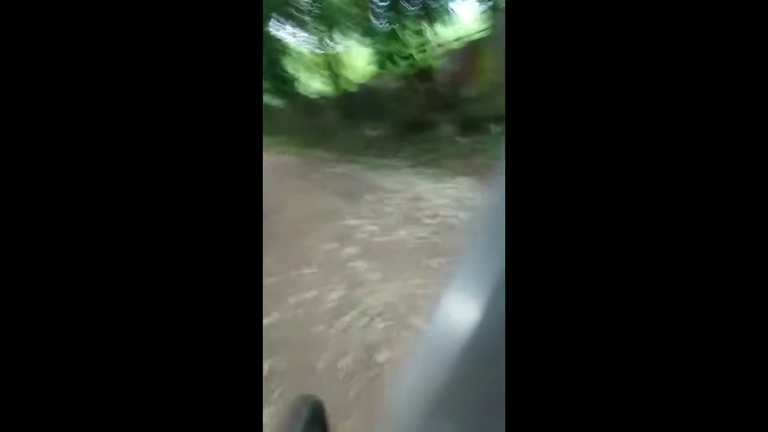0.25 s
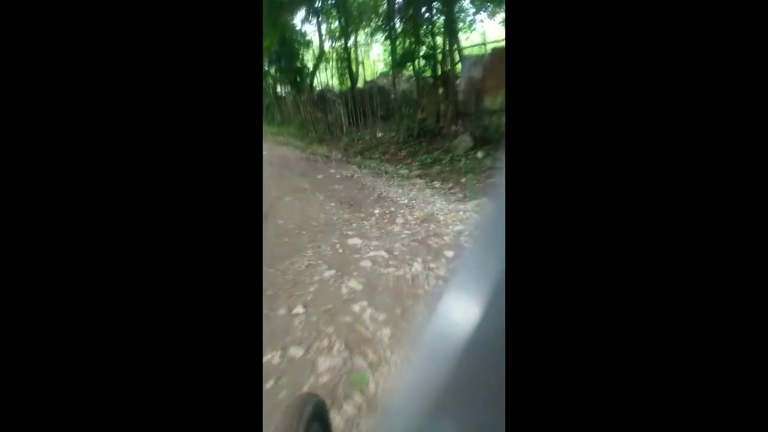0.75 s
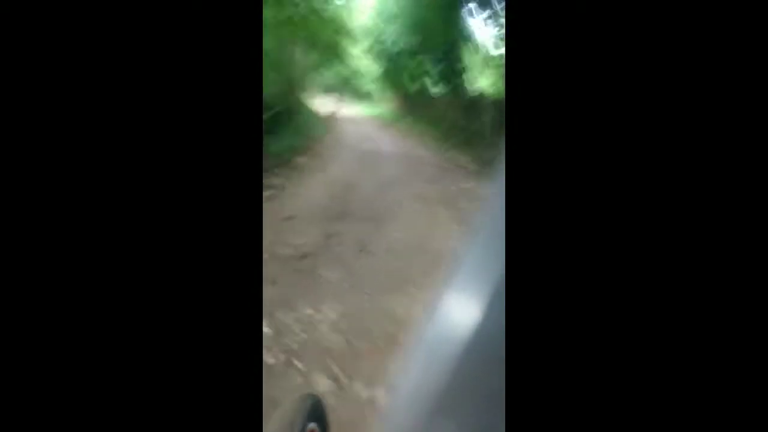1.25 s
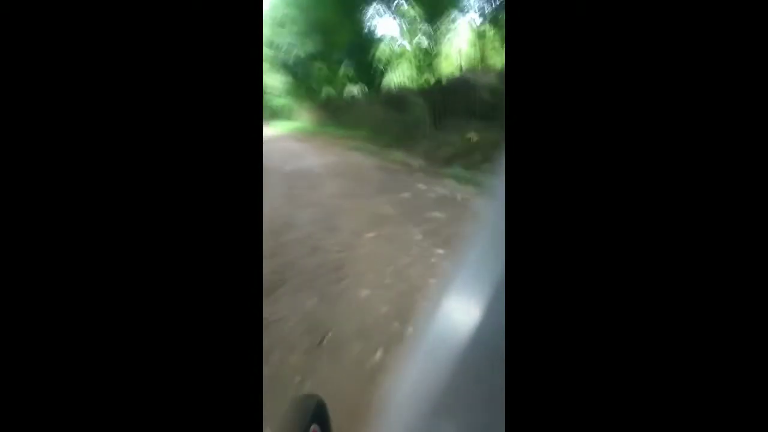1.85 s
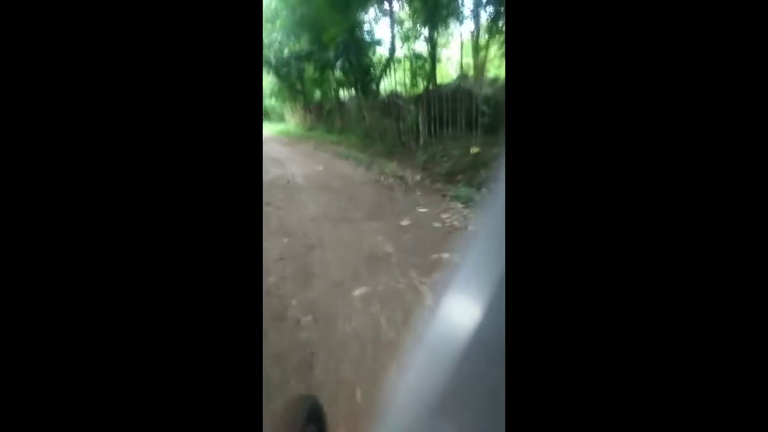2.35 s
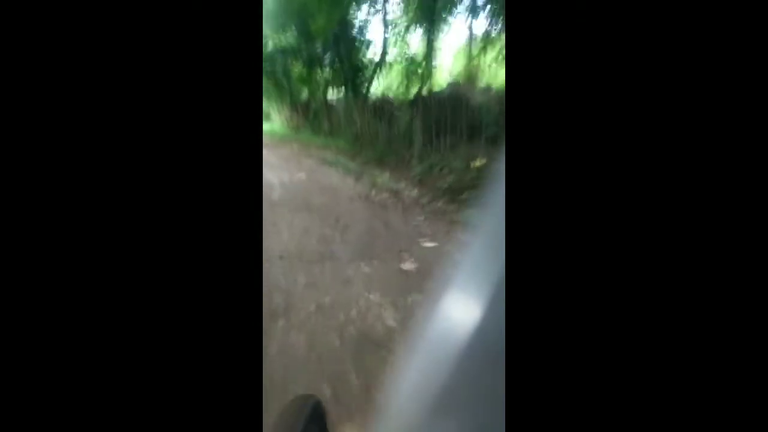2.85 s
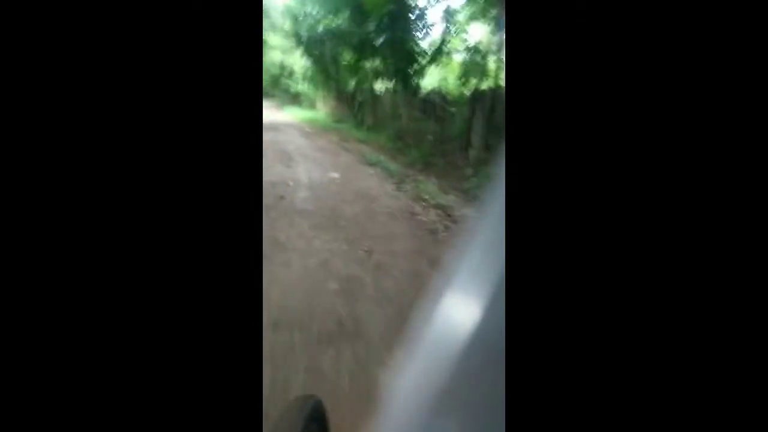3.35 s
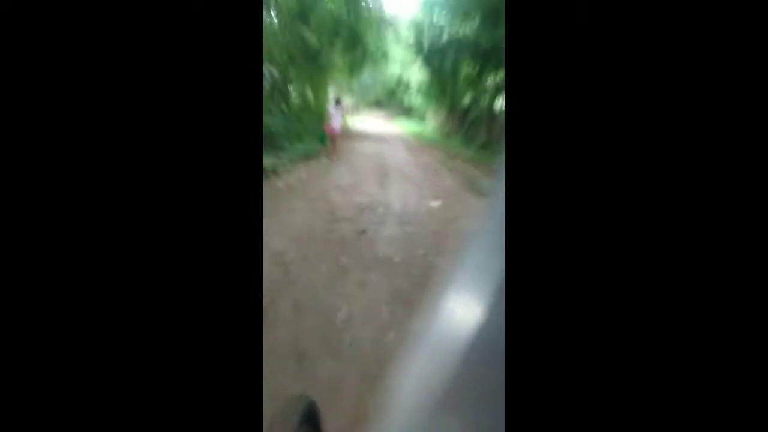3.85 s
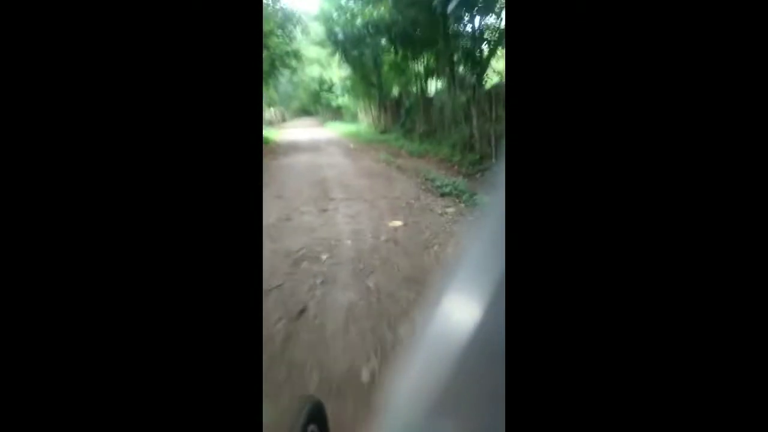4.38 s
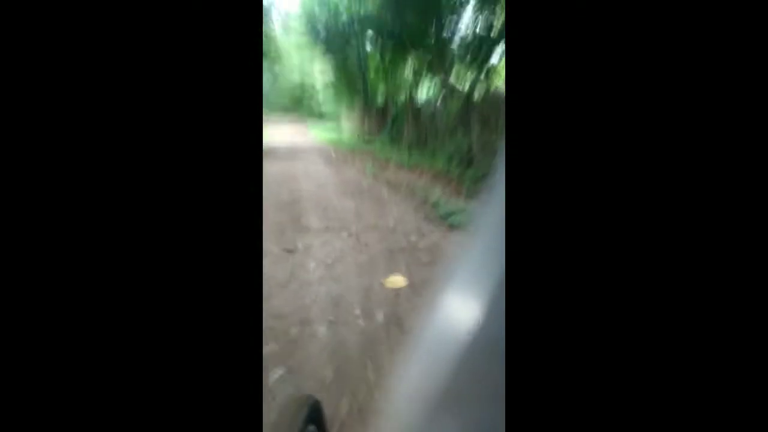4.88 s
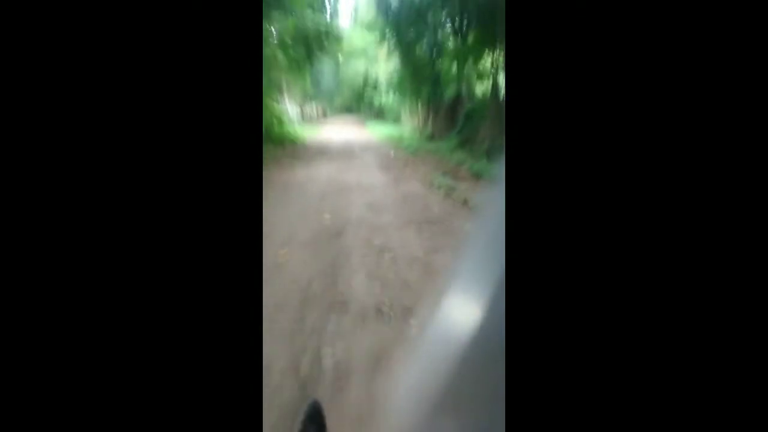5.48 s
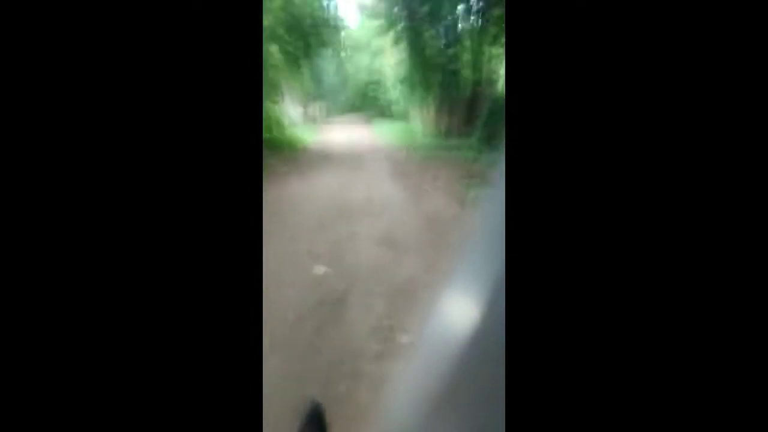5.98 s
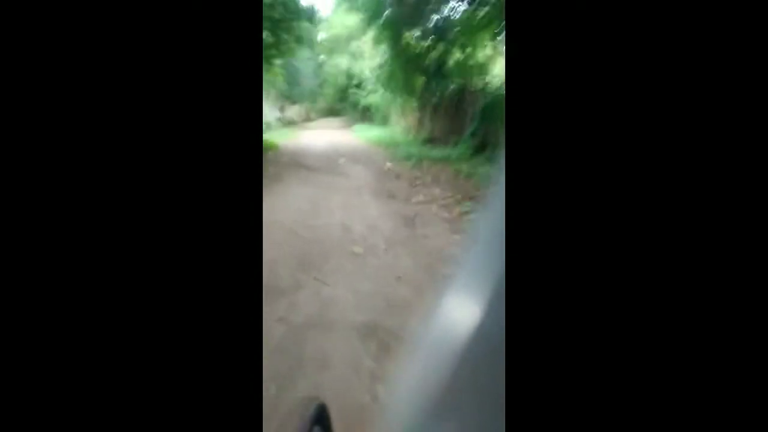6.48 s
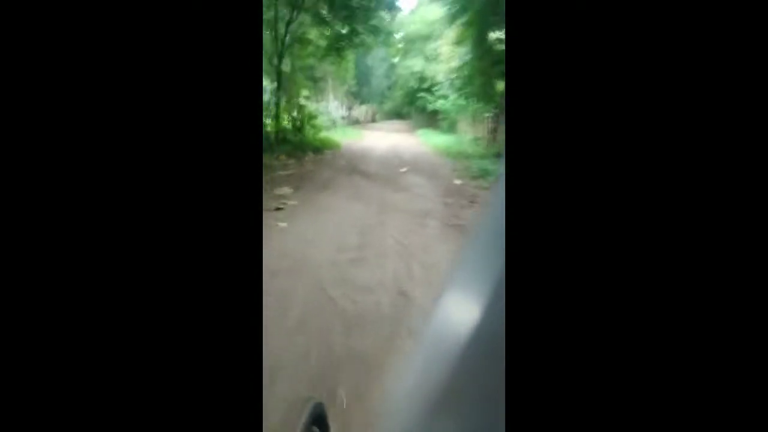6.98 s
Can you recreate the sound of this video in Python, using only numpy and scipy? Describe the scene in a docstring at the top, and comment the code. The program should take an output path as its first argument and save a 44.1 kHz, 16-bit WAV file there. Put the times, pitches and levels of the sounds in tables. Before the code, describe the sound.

Close on a coasting bike, high brake chirps give way to fast hub clicks, deepening rumble and thumps, then a violent clatter around six seconds.

```python
"""A bicycle coasts down a dirt trail, heard from close by.
A brake squeals at once, a wavering sine for each grab of the pad, over early knocks and scuffs of stones.
The freewheel ticks throughout as bursts of noise in a hub colour, unevenly quickening from 13 to 24 teeth a second.
Noise makes the rumble and tyre drumming that grow beneath, and the thumps over ruts from 1.5 s on.
Grit crackles as showers of tiny impacts; knocks of noise and ringing modes crowd in hardest around 6 s."""
import sys
import numpy as np
from scipy import signal
from scipy.fft import rfft, irfft
from scipy.io import wavfile
from scipy.ndimage import uniform_filter1d

SR = 44100
rng = np.random.default_rng(int(sys.argv[2]) if len(sys.argv) > 2 else 0)


def int16_out(signal):
    """Quantize to a 16-bit WAV file."""
    q = np.round(np.clip(np.atleast_2d(signal).T, -1, 1) * 32767)
    wavfile.write(sys.argv[1], SR, q.astype(np.int16))


N = 318831
TIME = np.arange(N) / SR

# Colour of struck metal, for pebbles and knocks alike. Each row: frequency in Hz, relative level in dB per Hz.
CLINK_COLOUR = [(800, -41.5), (2000, 6.5), (3200, 6.5), (4800, 1.5), (6500, 4), (8200, 11), (10500, -2.5),
                (13000, 2), (16000, -22)]


def amp(db):
    """Decibels to gain."""
    return 10 ** (np.asarray(db) / 20)


def unit(x):
    """Scales to rms 1."""
    return x / np.sqrt(np.mean(x ** 2) + 1e-20)


def add(mix, s, sound):
    """Mixes a sound in at time s."""
    part = mix[max(round(s * SR), 0):][:len(sound)]
    part += sound[:len(part)]


def curve(rows, axis):
    """One column of a table, joined by straight lines in time."""
    columns = np.transpose(rows)
    return np.interp(TIME, columns[0], columns[axis])


def colour(x, spectrum, size=8192):
    """Causal minimum-phase filter of unit energy with the given spectrum."""
    hz, db = np.transpose(spectrum)
    bin_hz = abs(np.fft.fftfreq(size, 1 / SR))
    bin_db = np.interp(np.log(bin_hz + 1), np.log(hz), db)
    log_gain = np.log(amp(bin_db))
    response = np.exp(np.conj(signal.hilbert(log_gain)))
    taps = np.fft.ifft(response).real[:size // 2]
    return signal.oaconvolve(x, taps / np.linalg.norm(taps))[:N]


def wander(hz):
    """Slow random drift of rms 1, up to about hz."""
    f = np.fft.rfftfreq(N, 1 / SR)
    spectrum = rfft(rng.standard_normal(N)) * np.exp(-(f / hz) ** 2)
    return unit(irfft(spectrum, N))


def ring(x, t60):
    """Follows a sound with a dense tail of unit energy that falls 60 dB in t60 seconds."""
    t = TIME[:SR]
    tail = rng.standard_normal(SR) * amp(-60 * t / t60)
    return signal.oaconvolve(x, tail / np.linalg.norm(tail))[:N]


def steady(x, span_s):
    """Evens out the slow swells of a signal, leaving its quick lumps."""
    power = abs(uniform_filter1d(x ** 2, int(span_s * SR)))
    return x / np.sqrt(power + 1e-9)


def clicks(per_s, spread_db):
    """Random impacts, most small and a few large."""
    sizes = amp(spread_db * np.minimum(rng.exponential(1, N), 3.5))
    signs = rng.choice([-1, 1], N)
    return sizes * signs * (rng.random(N) < per_s / SR)


def stones(per_s, spread_db, cycles, count=32):
    """Small stones crack together, each ringing briefly at its own pitch."""
    hits = clicks(per_s, spread_db)
    kind = rng.integers(0, count, N)
    t = TIME[:1000]
    out = np.zeros(N)
    for k, hz in enumerate(np.geomspace(620, 8000, count)):
        # a grain falls to 1/e in the given number of cycles
        grain = np.sin(2 * np.pi * hz * t) * np.exp(-hz * t / cycles) * hz
        out += signal.oaconvolve(hits * (kind == k), grain)[:N]
    return unit(out)


def rumble(low_db=3.5, drum_db=-3, rut_low_db=-1, rut_drum_db=-5, lump_db=7.5, buffet_db=4.5, buffet_hz=14):
    """Wind and ground shake the frame; the tyres drum in lumps on the packed dirt and thump over ruts."""
    # The ride grows rougher with speed.
    # Each row: time in seconds, low rumble in dB and tyre drumming in dB, both before trim.
    ride = [(0.0, -36.5, -41), (0.18, -53, -54.5), (0.85, -53, -61), (1.3, -43, -59), (2.6, -39.5, -44),
            (3.25, -35, -40), (3.65, -30, -36.5), (4.55, -35, -32), (5.3, -28.5, -24.5), (5.75, -32.5, -30),
            (5.95, -27, -29.5), (6.5, -34.5, -28.5), (7.0, -30.5, -24), (7.23, -30, -23.5)]
    # Each row: start in seconds, drumming in dB and low rumble in dB, both before trim.
    ruts = [(1.501, -36, -33), (1.714, -37, -33), (1.853, -32.5, -33), (2.281, -32, -28.5),
            (2.484, -35, -29.5), (2.769, -30, -45), (2.876, -25.5, -25), (3.109, -29, -48),
            (3.186, -27, -35), (3.476, -19.5, -41), (3.706, -15, -27), (3.877, -20, -22),
            (4.123, -23.5, -38), (4.289, -41, -22), (4.657, -17, -45), (4.824, -30, -22.5),
            (4.937, -21.5, -33), (5.253, -18, -35), (5.499, -14.5, -25.5), (5.584, -14.5, -37),
            (5.957, -14, -39), (6.338, -16, -26), (6.695, -14, -26), (6.752, -15.5, -32),
            (6.991, -19.5, -36)]
    # Colours of the shaking frame, drumming tyres and a thump over a rut.
    # Each row: frequency in Hz, relative level in dB per Hz.
    frame_colour = [(8, -10), (25, -0.5), (90, -4), (125, -14.5), (180, -23.5), (400, -43), (1000, -88)]
    drum_colour = [(50, -20), (90, -5.5), (125, 4), (175, -1), (240, -10), (330, -21), (480, -29),
                   (900, -48.5), (3000, -82.5)]
    thump_colour = [(50, -11.5), (90, -3), (125, 4), (175, -2), (240, -12), (330, -21), (480, -27),
                    (900, -49), (3000, -77)]

    low = steady(colour(rng.standard_normal(N), frame_colour), span_s=0.089)
    lumpy = rng.standard_normal(N) * amp(lump_db * wander(65))
    drum = steady(colour(lumpy, drum_colour), span_s=0.047)
    casing = steady(colour(rng.standard_normal(N), thump_colour), span_s=0.0312)
    # one unevenness shakes both together
    buffets = steady(amp(buffet_db * wander(buffet_hz)), span_s=0.2)

    rise_s = 0.0098  # a thump swells for this long, then dies away
    u = TIME[:SR // 4] / rise_s
    thump = u * np.exp(1 - u)
    shakes, thumps = np.zeros((2, N))
    for s, tyre_db, shake_db in ruts:
        add(thumps, s, amp(tyre_db + rut_drum_db) * thump)
        add(shakes, s, amp(shake_db + rut_low_db) * thump)

    low_level = np.hypot(buffets * amp(curve(ride, axis=1) + low_db), shakes)
    drum_level = buffets * amp(curve(ride, axis=2) + drum_db)
    return low * low_level + drum * drum_level + casing * thumps


def gravel(wash_db=-2, crunch_db=-3, ping_db=-10, scuff_db=1):
    """Fine dirt hisses, stones crunch under the tread, and sand and pebbles fly up against the metal."""
    # Loose grit under the tyres. Each row: time in seconds, level in dB before the layer trims.
    grit_levels = [(0.0, -40), (0.14, -51.5), (0.4, -51.5), (0.7, -54), (3.7, -53), (4.6, -51.5),
                   (5.65, -48.5), (6.8, -49), (7.23, -55.5)]
    # The tyres scuff through loose stones. Each row: centre in seconds, length in seconds,
    # level in dB before trim, sandy spray relative to the scuff in dB.
    scuffs = [(0.211, 0.029, -48.5, -11), (0.31, 0.06, -47.5, -9), (0.415, 0.13, -47.5, -8),
              (1.296, 0.13, -53, -19), (1.852, 0.29, -56, -18), (2.332, 0.12, -57.5, 2.5),
              (2.742, 0.11, -51, -1), (3.895, 0.095, -44.5, -21), (4.057, 0.023, -46.5, -6),
              (4.14, 0.077, -50, -15), (5.325, 0.049, -47, -11), (5.86, 0.078, -39, -34),
              (5.957, 0.074, -47.5, -25), (6.226, 0.038, -38.5, -22)]
    # Colour of dirt. Each row: frequency in Hz, relative level in dB per Hz.
    dirt_colour = [(150, 9.5), (350, 2.5), (700, 1), (1000, -1.5), (1400, -1.5), (1900, -2), (2500, -6.5),
                   (3400, -8), (5000, -13), (8000, -7.5), (11000, -9), (16000, -8)]

    wash = amp(wash_db + 4.4 * wander(50)) * rng.standard_normal(N)
    crunch = amp(crunch_db) * stones(per_s=1300, spread_db=5.0, cycles=4.9)
    flying = amp(ping_db) * unit(ring(clicks(per_s=15, spread_db=13.0), t60=0.034))

    loose, spray = np.zeros((2, N))
    for s, length, db, sandy_db in scuffs:
        swell = np.exp(-2 * np.minimum(abs(TIME - s) / length, 4) ** 2)
        scuff = amp(db + scuff_db) * swell
        loose = loose + scuff
        spray = spray + amp(sandy_db) * scuff
    scuffing = loose * stones(per_s=2400, spread_db=6.0, cycles=2.7)
    sand_band = signal.butter(2, [3000, 7000], "bandpass", fs=SR, output="sos")
    sand = unit(signal.sosfilt(sand_band, clicks(per_s=1100, spread_db=9)))

    grit = amp(curve(grit_levels, axis=1))
    ground = colour(grit * (wash + crunch) + scuffing, dirt_colour)
    pebbles = colour(grit * flying, CLINK_COLOUR)
    return ground + pebbles + spray * sand


def knocks(rattle_db=-8, clink_db=7, thud_db=11, rattle_t60=0.026, clink_t60=0.017, thud_s=0.00071,
           modes_db=-9, bounce_db=-11, bounce_t60=0.098, part_db=-2, part_t60=0.037):
    """Each jolt is a short push and rebound; the frame rings and loose parts bounce to rest."""
    # Jolts of the bicycle. Each row: start in seconds, rattle, thud and metal clink in dB before trim,
    # pitch of the struck part in Hz.
    jolts = [(0.047, -39, -62, -30.5, 2160), (0.08, -43, -50, -29.5, 2630),
             (0.197, -27.5, -61, -30.5, 2110), (0.24, -34, -47, -38, 2650), (0.32, -40, -53, -26.5, 2120),
             (0.354, -49, -64, -30.5, 1820), (0.389, -28.5, -36.5, -43, 1130), (0.44, -34, -60, -21, 3100),
             (0.506, -47, -59, -31.5, 3260), (0.688, -27, -64, -28.5, 1960),
             (1.332, -37.5, -44, -36.5, 1440), (1.807, -34, -49, -42, 1850), (1.905, -32, -37, -55, 560),
             (2.299, -40, -49, -35, 1820), (2.482, -28.5, -63, -40, 755), (3.225, -44, -52, -36.5, 1510),
             (3.831, -23.5, -41, -36.5, 1920), (3.892, -28, -56, -39, 920), (3.912, -27, -42, -22.5, 1690),
             (3.999, -26, -61, -53, 794), (4.573, -44, -57, -44, 1740), (4.615, -49, -60, -40, 3220),
             (4.662, -40, -32, -47, 654), (4.932, -35, -33, -39, 543), (4.962, -30.5, -50, -34, 2190),
             (5.009, -34.5, -48, -53, 970), (5.328, -25, -26, -33.5, 673), (5.527, -24, -23.5, -32, 1155),
             (5.71, -23, -41, -27.5, 612), (5.815, -24, -41, -35, 1946), (5.828, -42, -26, -45, 790),
             (5.85, -22, -37, -25.5, 716), (5.859, -21.5, -30, -45, 2030), (5.92, -15, -20.5, -23, 1234),
             (5.963, -21.5, -14.5, -31, 530), (5.973, -20.5, -17.5, -49, 753),
             (6.009, -20.5, -25, -32.5, 1164), (6.056, -25, -19, -35, 646), (6.096, -31, -30, -48, 1530),
             (6.183, -16.5, -17, -29, 520), (6.189, -13, -17.5, -41, 545), (6.211, -20, -12.5, -26.5, 575),
             (6.218, -28.5, -26, -25.5, 630), (6.282, -13, -19, -23.5, 513), (6.3, -31, -46, -35, 660),
             (6.345, -47, -22, -39, 501)]
    # Modes of the frame and its fittings. Each row: frequency in Hz, relative level in dB, t60 in seconds.
    frame_modes = [(416, 0, 0.05), (532, -9, 0.19), (627, 7.5, 0.027), (732, -7, 0.053), (960, -6, 0.029),
                   (1242, 8, 0.045), (1530, -7, 0.03), (1820, 5.5, 0.078), (2120, -5, 0.16),
                   (2385, 11.5, 0.021)]
    # Colour of loose parts. Each row: frequency in Hz, relative level in dB per Hz.
    rattle_colour = [(150, -3), (400, -33.5), (650, 7), (1000, -0.5), (1300, -1.5), (1600, 0), (2000, -4),
                     (2600, -18), (3300, -4.5), (5000, -23.5), (9000, -20), (16000, -26)]
    rebound_s, rebound_db = 0.0099, -13  # loose parts fall back and strike again

    t = TIME[:5000]
    rattle, clink, body = np.zeros((3, N))
    onset = 1 - np.exp(-t / 0.0016)
    u = (t - 0.0025) / thud_s
    push = u / (1 + u ** 2) ** 1.49 * onset * amp(-60 * t / 0.055)
    modes = np.array([amp(db - 60 * t / t60) * np.sin(2 * np.pi * hz * t) for hz, db, t60 in frame_modes])
    mode_hz = np.transpose(frame_modes)[0]
    clatter = amp(rattle_db - 60 * t / rattle_t60) * onset
    for s, loose_db, frame_db, metal_db, part_hz in jolts:
        add(rattle, s, amp(loose_db) * clatter)
        add(rattle, s + rebound_s, amp(loose_db + rebound_db) * clatter)
        add(clink, s, amp(metal_db + clink_db - 60 * t / clink_t60) * onset)
        add(body, s, 2 * amp(frame_db + thud_db) * push)
        # the struck part buzzes unsteadily
        wobble = np.cumsum(0.082 * rng.standard_normal(len(t)))
        buzz = np.sin(2 * np.pi * part_hz * t + wobble)
        add(body, s, amp(loose_db + part_db - 60 * t / part_t60) * onset * buzz)
        # it wakes the frame modes in random shares, favouring those nearest to it
        shares = rng.standard_normal(len(frame_modes)) / (1 + 4 * np.log(mode_hz / part_hz) ** 2)
        ringing = shares / np.linalg.norm(shares) @ modes
        add(body, s, amp(loose_db + modes_db) * onset * ringing)

    bounce = amp(bounce_db - 60 * t / bounce_t60)
    settling = signal.oaconvolve(rattle / np.sum(amp(-60 * t / rattle_t60)), bounce)[:N]
    bouncing = settling * stones(per_s=1800, spread_db=13.0, cycles=1.9)
    loose_parts = colour(rattle * rng.standard_normal(N) + bouncing, rattle_colour)
    metal = colour(clink * rng.standard_normal(N), CLINK_COLOUR)
    return body + loose_parts + metal


def brake(level_db=-1, edge_s=0.0034, flutter_db=4.5, echo_db=-12, echo_t60=0.39):
    """The pad grabs and slips, each time exciting a high disc mode; the trees echo the squeal."""
    # Grabs of the pad. Each row: start in seconds, length in seconds, starting level in dB before trim,
    # starting pitch in Hz above the disc mode, before drift.
    grabs = [(0.058, 0.028, -8, 342), (0.089, 0.13, -14, 321), (0.193, 0.012, -8.5, 400),
             (0.23, 0.036, -9, 375), (0.304, 0.021, -12, 528), (0.316, 0.038, -16, 170),
             (0.363, 0.017, -18, 55.4)]
    disc_hz = 11000
    sag_hz_per_s, slip_db_per_s = 900, 15  # a grab sinks in pitch and level as the pad slips

    squeal = np.zeros(N)
    t = TIME[:SR]
    drift_hz = 45 * wander(68)[:SR]
    for s, length, db, sharp_hz in grabs:
        grip = (np.tanh((t - s) / edge_s) - np.tanh((t - s - length) / edge_s)) / 2
        hz = disc_hz + sharp_hz - sag_hz_per_s * (t - s) + drift_hz
        tone = np.sin(2 * np.pi * np.cumsum(hz) / SR)
        add(squeal, 0, amp(db + level_db - slip_db_per_s * (t - s)) * grip * tone)
    squeal = squeal * amp(flutter_db * np.tanh(wander(100)))
    return squeal + amp(echo_db) * ring(squeal, t60=echo_t60)


def freewheel(level_db=1.5, lead_s=0.0046, spread_s=0.0041, ring_db=-8, hiss_db=-60, vary_db=3.0, tooth_db=1.5):
    """At each tooth the pawls drop and chatter for a few milliseconds; the hub rings on."""
    # Speed of the freewheel. Each row: time in seconds, ratchet teeth per second.
    ratchet = [(0.0, 13.37), (0.15, 16.7), (0.6, 14.27), (1.05, 13.45), (1.8, 16.71), (2.25, 17.22),
               (2.4, 20.8), (2.55, 17.55), (4.05, 23.11), (4.5, 20.65), (4.65, 24.1), (4.8, 21.85),
               (5.4, 24.38), (5.55, 22.98), (6.0, 24.83), (6.6, 22.92), (6.75, 24.92), (7.2, 24.22)]
    # Level of the pawl ticks. Each row: time in seconds, level in dB before trim and tooth variation.
    tick_levels = [(0.0, -37), (0.9, -39), (1.4, -39.5), (2.2, -38), (3.05, -37.5), (3.9, -42.5),
                   (4.9, -38), (7.23, -40.5)]
    # Colour of a pawl tick. Each row: frequency in Hz, relative level in dB per Hz.
    pawl_colour = [(500, -22), (1200, -31), (1800, -17), (2800, -32), (5200, -24.5), (6600, -17.5),
                   (7800, -10), (9200, -19), (11000, -26), (12800, -37.5), (14000, -5.5), (14600, -6),
                   (15150, 1.5), (15700, -21.5)]
    jitter_s = 0.0005  # the teeth are slightly uneven

    teeth_passed = np.cumsum(curve(ratchet, axis=1)) / SR
    drops = np.flatnonzero(np.diff(np.floor(teeth_passed), prepend=-1))
    db = curve(tick_levels, axis=1)
    t = TIME[:1200]
    force = np.zeros(N)
    for at, (size, width, late) in zip(drops, rng.standard_normal((len(drops), 3))):
        # the burst starts ahead of the drop and peaks on it
        burst = np.exp(-0.5 * ((t - lead_s) / (spread_s * np.exp(0.17 * width))) ** 2)
        add(force, at / SR - lead_s + jitter_s * late, burst * amp(db[at] + tooth_db * size))

    chatter = force * rng.standard_normal(N) * amp(level_db + 1.7 * wander(700))
    hiss = amp(hiss_db + 1.5 * wander(120)) * rng.standard_normal(N)
    hub = colour(chatter + amp(ring_db) * ring(chatter, t60=0.15) + hiss, pawl_colour)
    # no two teeth are alike: the lower resonances answer more or less
    low_pass = signal.butter(2, 11000, fs=SR, output="sos")
    lower = signal.sosfiltfilt(low_pass, hub)
    return hub + lower * (amp(vary_db * wander(7)) - 1)


def scene():
    """Everything sounds close to the one microphone."""
    return (rumble() + gravel() + knocks() + brake() + freewheel())[None]


def record(dry):
    """The recorder's band limit: a steep low-pass around 15.9 kHz."""
    edge_hz = 15900
    low_pass = signal.firwin(255, edge_hz, window=("kaiser", 9), fs=SR)
    return signal.oaconvolve(dry, low_pass[None], "same")


dry = scene()
out = record(dry)
int16_out(out)
```